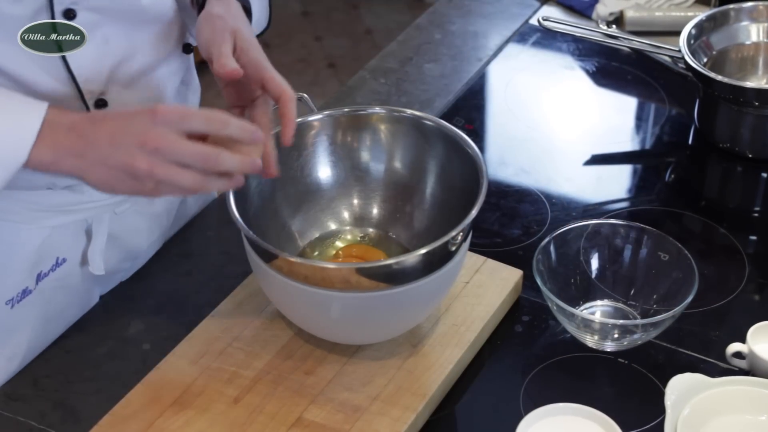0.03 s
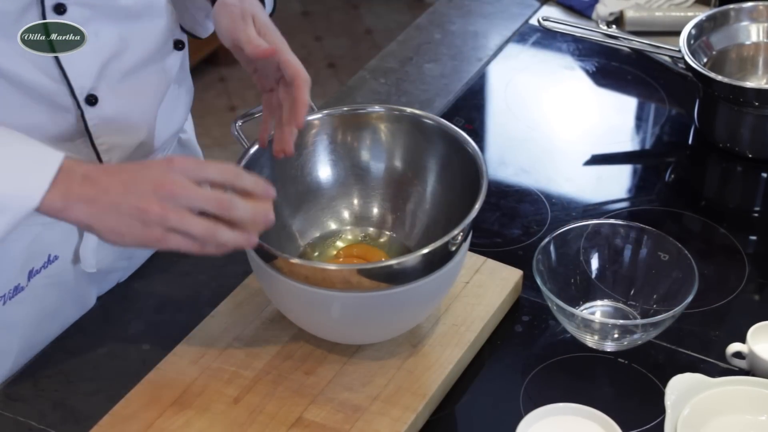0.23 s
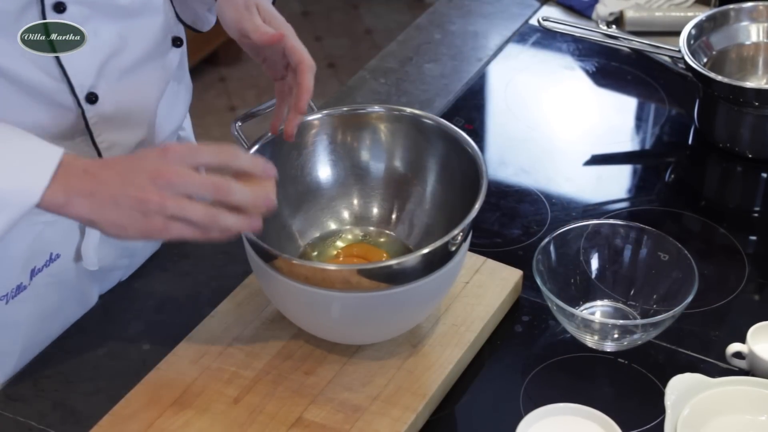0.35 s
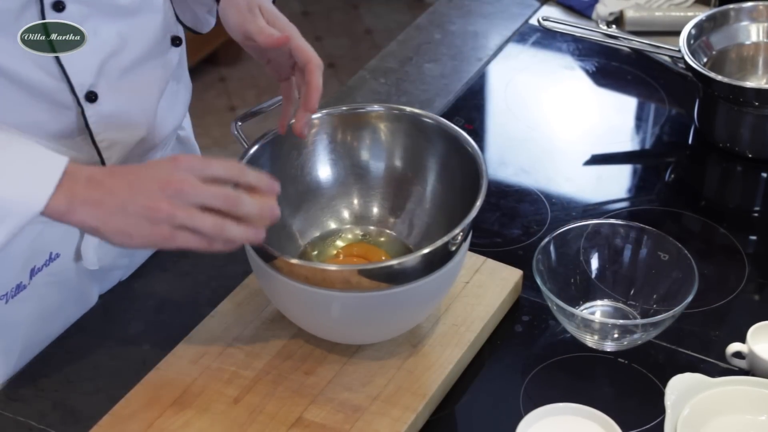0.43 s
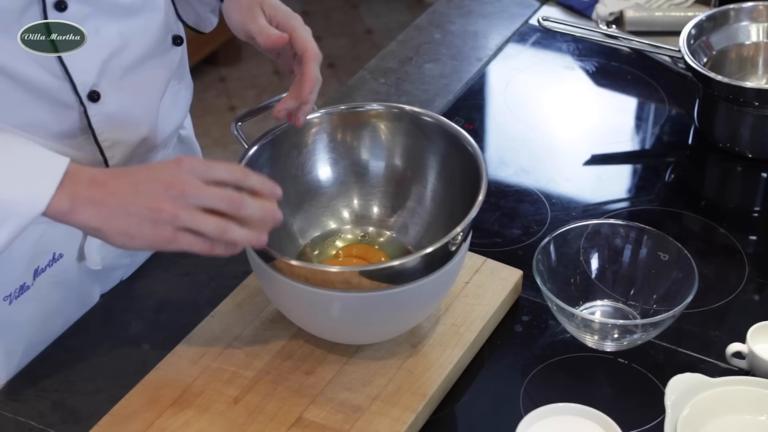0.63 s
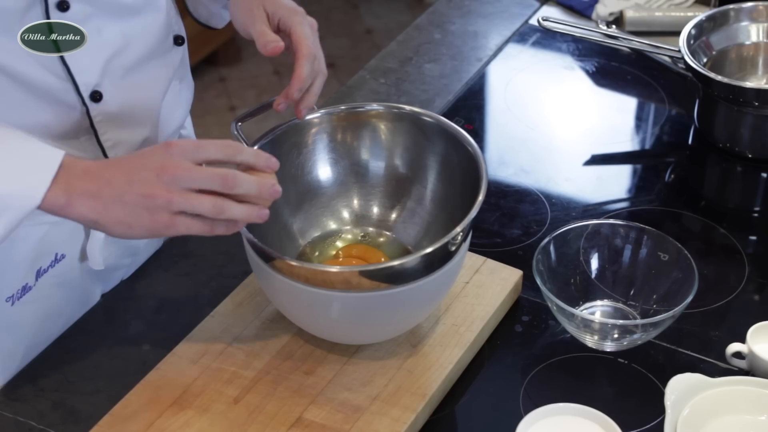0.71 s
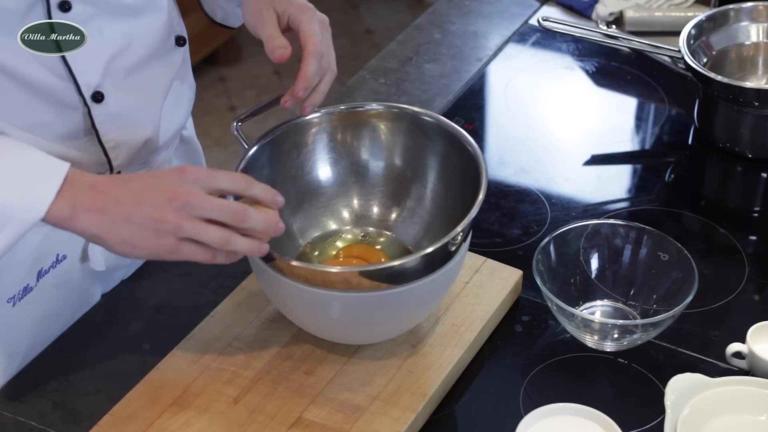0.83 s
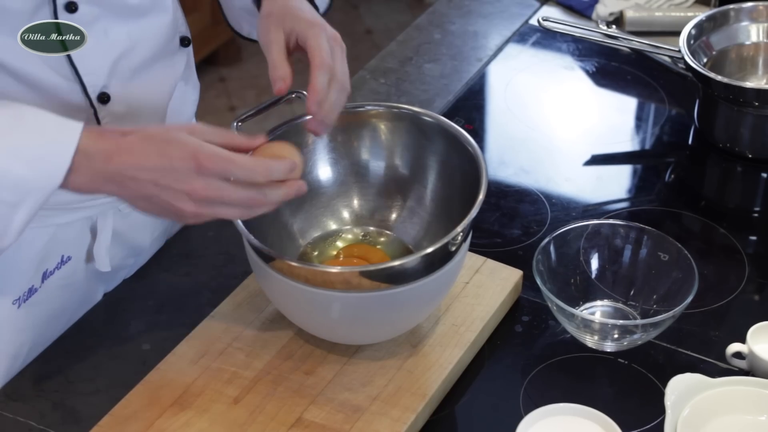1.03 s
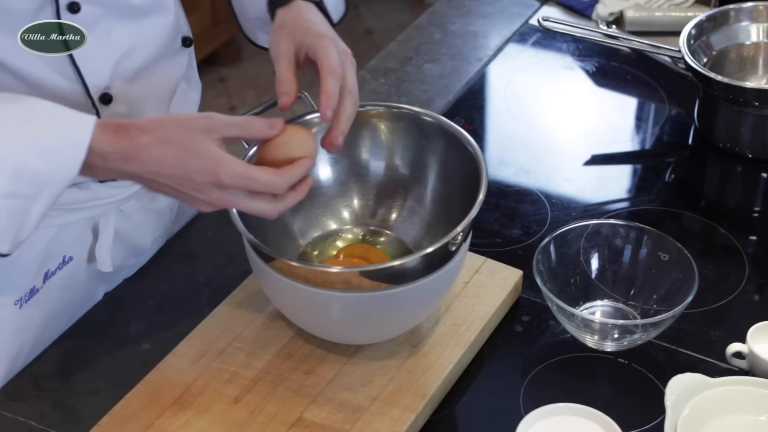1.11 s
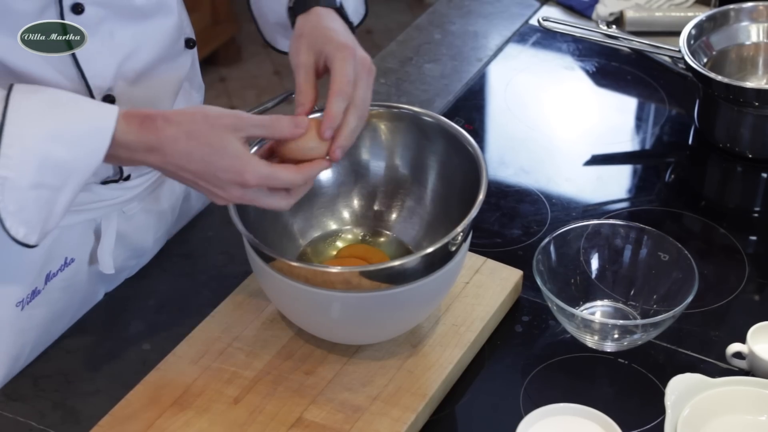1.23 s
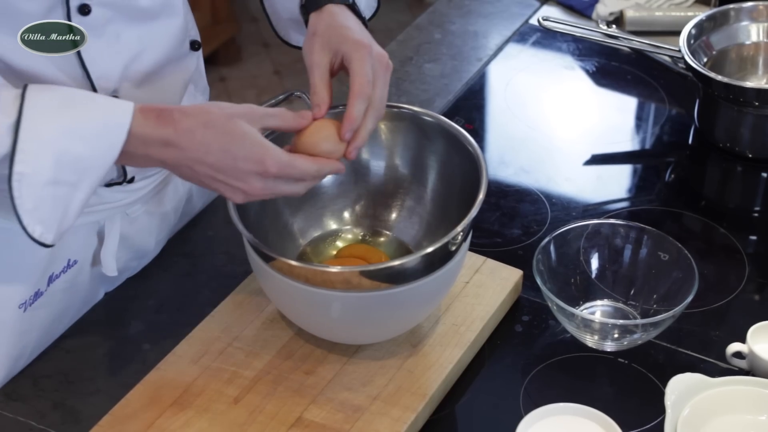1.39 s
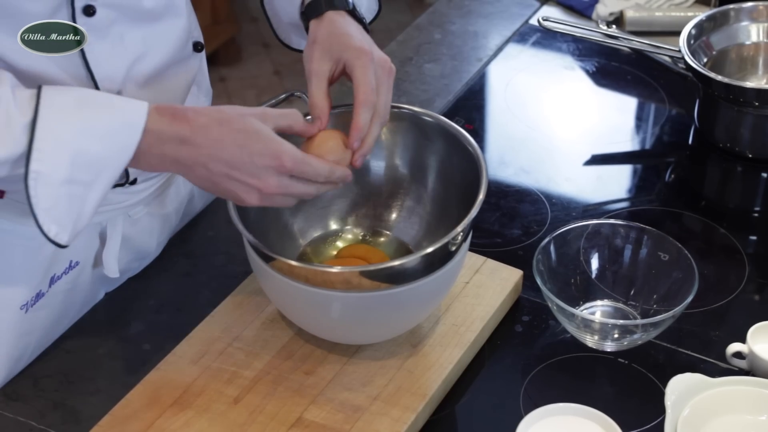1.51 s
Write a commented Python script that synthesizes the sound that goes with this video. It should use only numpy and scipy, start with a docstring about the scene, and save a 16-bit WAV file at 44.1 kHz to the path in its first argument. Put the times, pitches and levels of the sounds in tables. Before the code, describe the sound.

Close-miked egg cracking on a metal bowl: a sharp knock with a short ring, three quieter taps crushing the shell, a fading metallic tail, then tiny finger clicks on shell over soft room hiss and low hum.

```python
"""Room hiss, a low hum and one faint shell tick come first; then an egg is tapped four times on a steel bowl.
The first tap is a hard crack; the next three crush the broken shell. Each knocks the bowl on its wooden
board and sets it ringing. Fingers then press faint ticks from the shell while the hum rises slowly.
Snaps and ticks are filtered clicks, crunches are bursts of tiny fractures, and knocks and ringing are
dying sines. Filtered noise makes the hiss, the rumble and the kitchen's echo; plain sines make hum and drone."""
import sys
import numpy as np
from scipy import signal
from scipy.fft import rfft, irfft
from scipy.io import wavfile

SR = 44100
rng = np.random.default_rng(int(sys.argv[2]) if len(sys.argv) > 2 else 0)


def file_out(sig):
    """Save sig as 16-bit WAV at sys.argv[1]."""
    # one column per channel
    cols = np.atleast_2d(sig).T
    # limit, then scale
    lim = np.clip(cols, -1, 1)
    pcm = np.round(lim * 32767).astype(np.int16)
    wavfile.write(sys.argv[1], SR, pcm)


N = 68355  # length in samples
TIME = np.arange(N) / SR  # seconds

# The four taps, one per row: start_s, crack_db, knock_db, knock_brightness_hz, knock_pitch_hz, crunch_db,
# crunch_swell_s, crunch_pitch_hz, dull_crush_db, ring_db, ring_tilt_db_per_octave, favoured_hz (pitch around
# which this tap sets the wall ringing most), favoured_boost_db
TAPS = [(0.247, -1.5, 0, 1600, 626, -20, 0.0025, 6300, -32.5, 1.5, -2.5, 4210, 8.5),
        (0.4592, -30.5, -9.5, 650, 445, -22.5, 0.0026, 6080, -38, -7, 2, 2258, 4.5),
        (0.6530, -24.5, -6.5, 500, 435, -19.5, 0.0024, 6200, -33, -5, 1, 3410, 9.5),
        (0.8622, -26.5, -21.5, 905, 630, -22, 0.0022, 6200, -39, -8, 10, 5085, 14)]


def from_db(db):
    """Turn decibels into a gain."""
    return 10 ** (np.asarray(db) / 20)


def rms_one(x):
    """Scale to an RMS level of one."""
    return x / np.sqrt(np.mean(x ** 2) + 1e-20)


def at_hz(points, hz, axis=1):
    """Read one column of a table between its listed pitches, on a log pitch scale."""
    points = np.array(points)
    return np.interp(np.log(np.maximum(hz, 1)), np.log(points[:, 0]), points[:, axis])


def decay(start, t60):
    """Silent before the start, then falling from one by 60 dB in t60 seconds."""
    return (TIME >= start) * np.exp(-np.log(1000) * np.maximum(TIME - start, 0) / t60)


def click(start):
    """A single sample of height one."""
    return 1.0 * (np.arange(N) == int(start * SR))


def ring(start, hz, t60):
    """One struck mode: a two-pole resonator turns a click into a dying sine."""
    shrink = np.exp(-np.log(1000) / (t60 * SR))  # per sample
    turn = 2 * np.pi * hz / SR  # radians per sample
    feedback = [1, -2 * shrink * np.cos(turn), shrink * shrink]
    return signal.lfilter([0, np.sin(turn)], feedback, click(start) + 1e-18)


def low_pass(x, hz, order=2):
    """Butterworth filter that dulls everything above hz."""
    sos = signal.butter(order, min(hz, SR / 2 - 1), fs=SR, output="sos")
    return signal.sosfilt(sos, x + 1e-18)


def coloured(x, spectrum):
    """Give a sound the listed spectrum without smearing it ahead in time (minimum phase)."""
    level_db = at_hz(spectrum, np.linspace(0, SR / 2, N + 1))
    cepstrum = irfft(np.log(from_db(level_db)))
    # folding the cepstrum onto positive times makes the filter causal
    cepstrum[1:N] *= 2
    cepstrum[N + 1:] = 0
    response = np.exp(rfft(cepstrum))
    return irfft(rfft(x, 2 * N) * response)[:N]


def background():
    """Filtered noise gives hiss and deep rumble; sines give a steady drone and a hum that dips, then climbs."""
    # low hum: time_s, pitch_hz, level_db
    hum_path = [(0, 62.1, -52), (0.128, 60.5, -50), (.22, 59.9, -48.5), (0.598, 69.5, -52),
                (.95, 73, -53.5), (1.119, 78, -56), (1.26, 79.2, -62.5), (1.42, 82.1, -60),
                (1.55, 82.7, -70.5)]
    # faint appliance drone: pitch_hz, level_db
    drone_tones = [(200, -77), (300, -78), (3101, -83.5)]
    # colour of the room hiss: frequency_hz, relative_level_db_per_hz
    hiss_spectrum = [(15, -2.5), (30, -4.5), (48, -15.5), (100, -22.5), (180, -23.5), (400, -33.5),
                     (800, -35.5), (1700, -41), (3000, -41.5), (4000, -43), (6000, -45.5), (10000, -53.5),
                     (16000, -54)]
    # deep rumble while the hand moves: time_s, level_db
    rumble_path = [(0, -49), (.3, -51), (.7, -47), (.95, -49.5), (1.2, -81.5), (1.55, -75.5)]
    hiss_db, rumble_top_hz = -57, 32.7

    hum_s, hum_hz, hum_db = np.transpose(hum_path)
    hum_phase = 2 * np.pi * np.cumsum(np.interp(TIME, hum_s, hum_hz)) / SR
    hum = from_db(np.interp(TIME, hum_s, hum_db)) * np.sin(hum_phase)
    drone = sum(from_db(db) * np.sin(2 * np.pi * (hz * TIME + rng.random())) for hz, db in drone_tones)
    hiss = from_db(hiss_db) * rms_one(coloured(rng.standard_normal(N), hiss_spectrum))
    deep = low_pass(rng.standard_normal(N), rumble_top_hz, order=4)
    rumble_s, rumble_db = np.transpose(rumble_path)
    rumble = from_db(np.interp(TIME, rumble_s, rumble_db)) * rms_one(deep)
    # root two gives each sine the RMS level its table lists
    return np.sqrt(2) * (hum + drone) + hiss + rumble


def kitchen(x):
    """Quick reflections from bowl and worktop, then the room's tail, made of fading noise in 14 bands."""
    # frequency_hz, early_db, tail_db, tail_t60_s
    room_bands = [(150, -3, -0.5, 0.56), (500, -5.5, -8, 0.38), (1280, 0.5, -0.5, 0.59),
                  (3330, -5, -0.5, 0.17), (6200, 4, -16, 0.29), (9000, -9.5, -8.5, 0.51),
                  (15000, 3, -6.5, 0.13)]
    early_delay_s, early_t60_s, tail_delay_s = 0.0016, 0.068, 0.002

    edges_hz = np.geomspace(80, 18000, 15)
    white = rng.standard_normal((2, N))
    response = np.zeros(N)
    for k, (low, high) in enumerate(zip(edges_hz, edges_hz[1:])):
        band = signal.butter(2, [low, high], "band", fs=SR, output="sos")
        hz = np.sqrt(low * high)
        noise = signal.sosfilt(band, white[k % 2])
        early = rms_one(noise * decay(early_delay_s, early_t60_s))
        early = early * from_db(at_hz(room_bands, hz, axis=1))
        # the same noise backwards serves as a separate tail
        tail_t60_s = at_hz(room_bands, hz, axis=3)
        tail = rms_one(noise[::-1] * decay(tail_delay_s, tail_t60_s))
        tail = tail * from_db(at_hz(room_bands, hz, axis=2))
        response += (early + tail) * np.sqrt(2 * (high - low) / SR / N)  # wider bands carry more
    return signal.fftconvolve(x, response)[:N]


def shell_ticks():
    """Faint clicks of the shell in the fingers, each coloured around its own pitch."""
    # start_s, level_db, pitch_hz
    tick_list = [(0.0240, -30.5, 6130), (1.415, -42, 5920), (1.464, -46.5, 9000), (1.497, -40.5, 6800),
                 (1.5037, -36, 4700), (1.54, -50, 5880), (1.5465, -33.5, 6200)]
    # colour of one tick: multiple_of_pitch, relative_level_db
    tick_spectrum = np.array([(.17, -34.5), (.5, -21), (.75, -7.5), (.92, 2), (1.2, -4.5), (1.6, -15),
                              (2.5, -34)])
    return sum(from_db(db) * coloured(click(start), tick_spectrum * [hz, 1]) for start, db, hz in tick_list)


def thump():
    """The bowl's lowest flexing mode hums after each knock."""
    pitch_hz, t60_s = 122.8, 0.46
    base_db, follow = -29.5, 0.79  # follow: dB of thump per dB of knock
    return sum(from_db(base_db + follow * knock_db) * ring(start, pitch_hz, t60_s)
               for start, _, knock_db, *_ in TAPS)


def knock():
    """Each tap shoves the bowl against the board; a crushed shell makes a softer, duller contact."""
    # the bowl rocking on its board: pitch_hz, relative_level_db, t60_s
    rocking_modes = [(215, -48.5, .05), (280, -40.5, 0.042), (325, -29.5, 0.054), (458.5, -24, 0.081),
                     (500, -14.5, 0.055), (606, -15, .03), (757, -15, 0.0083), (1187, -11.5, 0.019),
                     (1600, -4, .02)]
    fall_db_per_octave = 12.5  # modes away from the tap's knock pitch are weaker

    out = np.zeros(N)
    for start, _, knock_db, bright_hz, pitch_hz, *_ in TAPS:
        body = np.zeros(N)
        for hz, mode_db, t60 in rocking_modes:
            octaves_away = abs(np.log2(hz / pitch_hz))
            body += from_db(mode_db - fall_db_per_octave * octaves_away) * ring(start, hz, t60)
        out -= from_db(knock_db) * low_pass(body, bright_hz)  # the first push is downward
    return out


def overtones(count=60):
    """Many weak wall modes scattered over the treble, as rows of pitch_hz, relative_level_db, t60_s."""
    # level of these modes along the treble: pitch_hz, relative_level_db
    overtone_levels = [(2500, -59.5), (3500, -64.5), (4500, -56), (5100, -53.5), (5700, -54), (6800, -61.5),
                       (8000, -76.5)]
    t60_s = 0.71
    pitches = np.linspace(overtone_levels[0][0], overtone_levels[-1][0], count)
    spacing = pitches[1] - pitches[0]
    pitches = pitches + spacing * rng.uniform(-0.42, 0.515, count)
    return [(hz, at_hz(overtone_levels, hz), t60_s) for hz in pitches]


def bowl():
    """The steel wall rings on; every tap favours other modes and chokes what still rings."""
    # main modes of the bowl's wall, three matching lists: pitch_hz, relative_level_db, t60_s
    mode_pitches = [1189, 2254, 2262, 2538, 2815, 3143, 3208, 3482, 3521, 3838, 4178, 4207, 4590, 4930,
                    5045, 5158, 5457, 5672, 5843, 5903, 6100, 6345, 6768]
    mode_levels = [-42.5, -40, -36, -48.5, -50, -43, -44, -48, -49.5, -38.5, -51, -45.5, -52, -36, -51,
                   -40.5, -46, -42.5, -33.5, -43.5, -39.5, -39.5, -42]
    mode_t60s = [0.43, 0.37, 0.29, .33, 0.6, .55, 0.22, 0.93, 0.36, 0.47, 0.79, .8, .65, .48, 0.46, .54,
                 0.66, 0.23, 0.16, 0.32, .13, .35, 0.45]
    favour_width_octaves = 0.07
    contact_damping_db = -5  # the egg chokes the earlier ringing each time it lands

    modes = list(zip(mode_pitches, mode_levels, mode_t60s)) + overtones()
    out = np.zeros(N)
    for start, *_, ring_db, tilt_db, favoured_hz, boost_db in TAPS:
        out = out * from_db(contact_damping_db * (TIME >= start))
        for hz, mode_db, t60 in modes:
            octaves = np.log2(hz / favoured_hz)
            closeness = np.exp(-(octaves / favour_width_octaves) ** 2)
            favour_db = tilt_db * octaves + boost_db * closeness
            out += from_db(ring_db + mode_db + favour_db) * ring(start, hz, t60)
    return out


def crunch():
    """The shell gives way in a run of tiny fractures, bright and dull, that swells and dies in milliseconds."""
    # splintering shell: multiple_of_crunch_pitch, relative_level_db
    splinter_spectrum = np.array([(.1, -37), (.2, -29), (.33, -21), (.7, -22.5), (.87, -6.5), (1, -2),
                                  (1.11, -6), (1.23, -12), (1.41, -15), (1.8, -27), (2.1, -39.5),
                                  (2.5, -39.5)])
    # duller sound of the shell caving in: frequency_hz, relative_level_db
    crush_spectrum = [(80, -17), (170, -6.5), (330, 3), (550, -7.5), (950, -5.5), (1600, -8.5), (2600, -24),
                      (5000, -60.5)]
    fractures_per_s, size_spread_db = 1900, 10

    out = np.zeros(N)
    for start, _, _, _, _, crunch_db, swell_s, pitch_hz, crush_db, *_ in TAPS:
        age = np.maximum(TIME - start, 0) / swell_s
        force = age * np.exp(1 - age)  # peaks at one after swell_s
        sizes = from_db(size_spread_db * rng.standard_normal(N)) * rng.choice([-1, 1], N)
        breaks = rng.random(N) < fractures_per_s / SR
        fractures = force * sizes * breaks
        bright = from_db(crunch_db) * rms_one(coloured(fractures, splinter_spectrum * [pitch_hz, 1]))
        dull = from_db(crush_db) * rms_one(coloured(fractures, crush_spectrum))
        out += (bright + dull) * np.sqrt(np.mean(force ** 2))
    return out


def crack():
    """The instant of contact: one broad snap per tap, and a second, inverted click a millisecond later."""
    # the snap of the shell on steel: frequency_hz, relative_level_db
    snap_spectrum = [(100, 20), (600, 2), (1500, 4), (2400, -24.5), (3800, 10), (6500, 6.5), (8000, 5),
                     (10700, -2.5), (12000, -20.5), (13500, -19), (15000, -14)]
    bounce_s, bounce_db = 0.001, 0
    snaps = np.zeros(N)
    for start, crack_db, *_ in TAPS:
        bounce = from_db(bounce_db) * click(start + bounce_s)
        snaps += from_db(crack_db) * (click(start) - bounce)  # the bounce comes back upside down
    return coloured(snaps, snap_spectrum)


def scene():
    """Mix egg, bowl and kitchen; the bowl's ringing reaches the room's echo more weakly than the taps."""
    ring_room_db = -19
    contact = crack() + crunch() + knock() + shell_ticks()
    steel = bowl()
    echo = kitchen(contact + from_db(ring_room_db) * steel)
    return (contact + steel + thump() + echo + background())[None]


def record(dry):
    """A steep elliptic low-pass filter cuts off the top of the treble."""
    cutoff_hz = 15800
    sos = signal.ellip(10, 0.2, 80, cutoff_hz, fs=SR, output="sos")  # 0.2 dB ripple, 80 dB cut
    return signal.sosfilt(sos, dry)


dry = scene()
out = record(dry)
file_out(out)
```